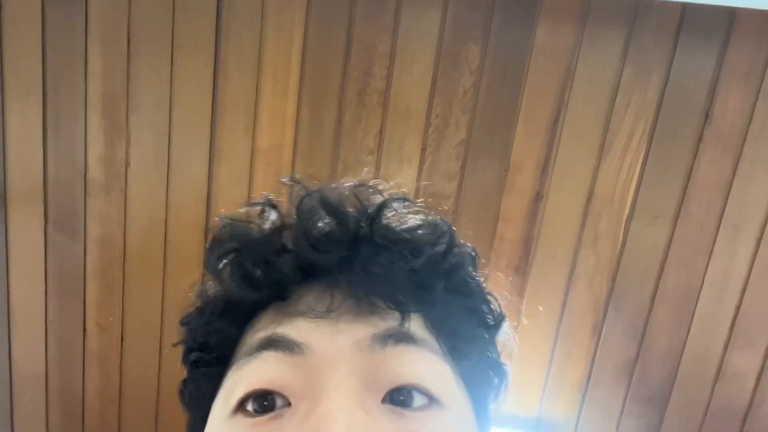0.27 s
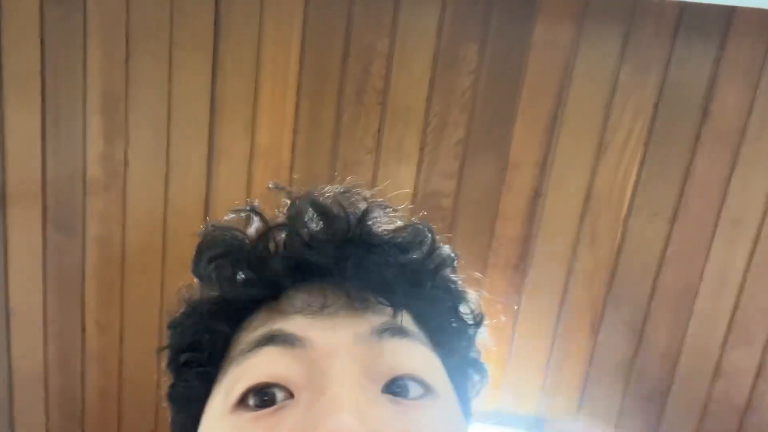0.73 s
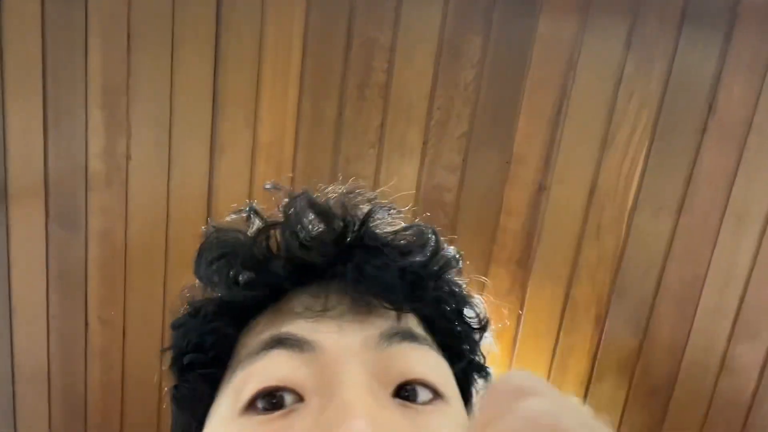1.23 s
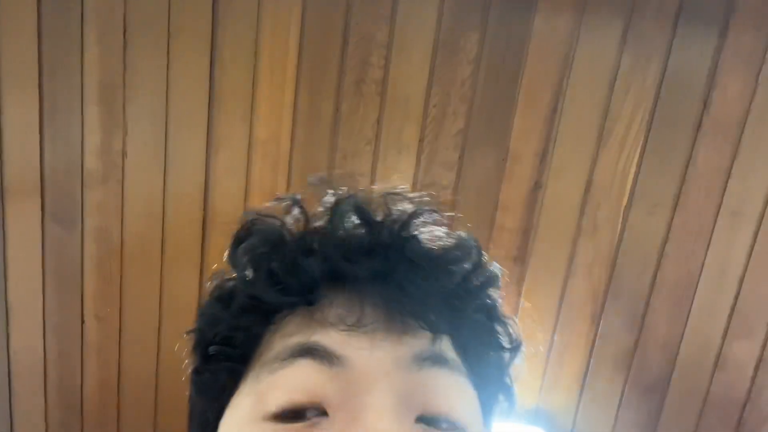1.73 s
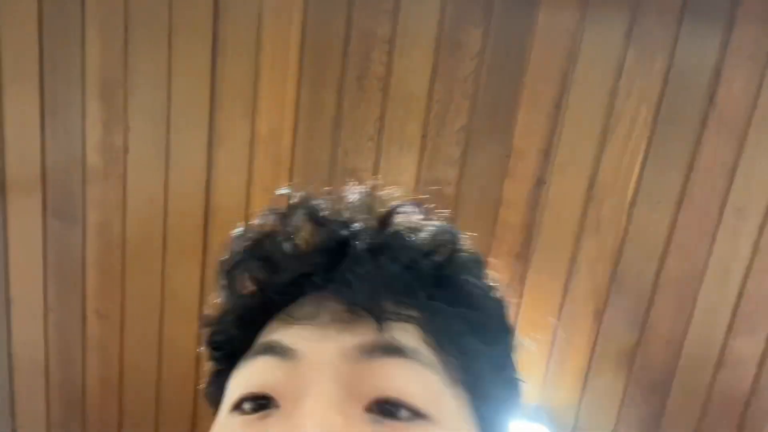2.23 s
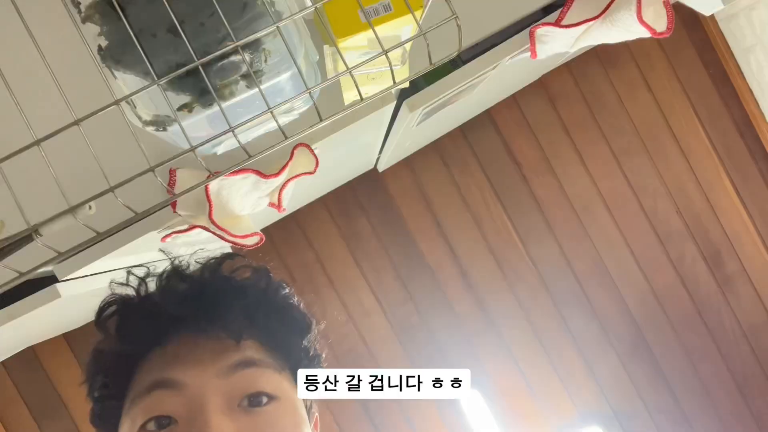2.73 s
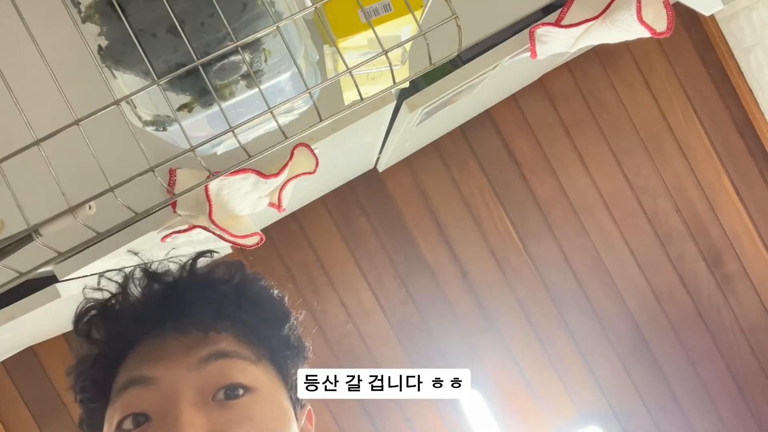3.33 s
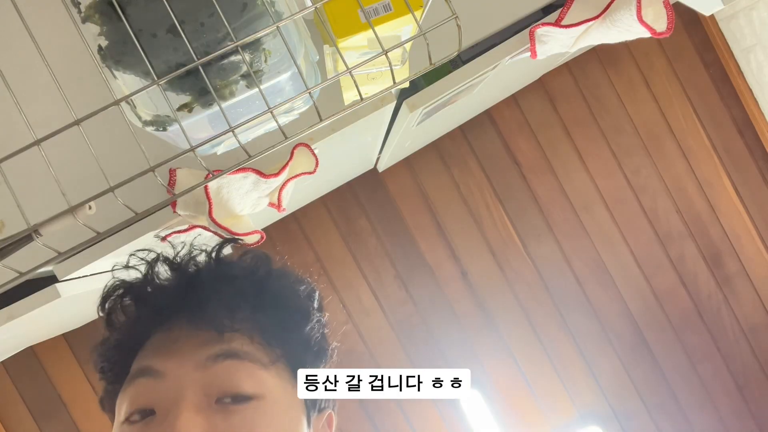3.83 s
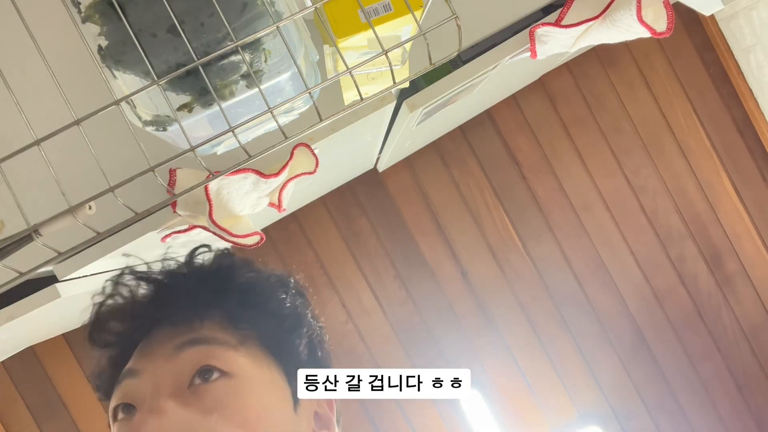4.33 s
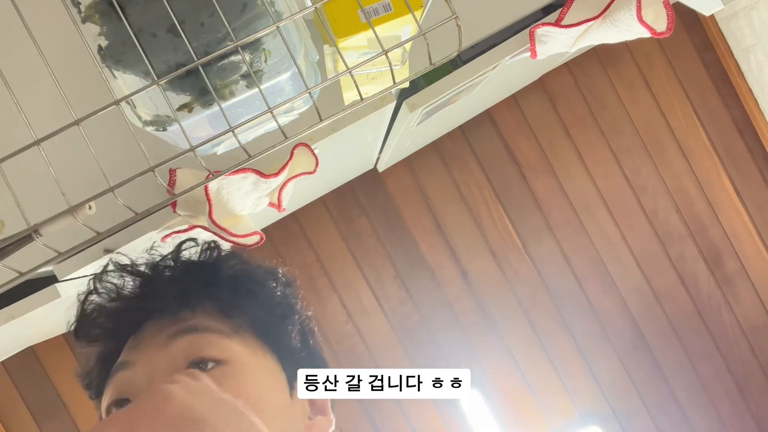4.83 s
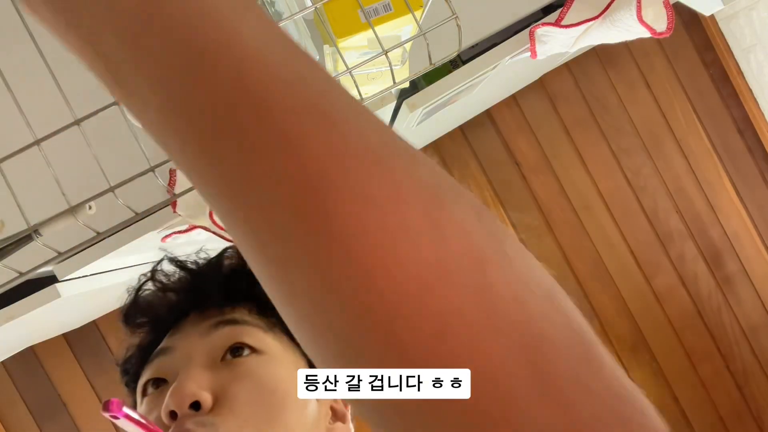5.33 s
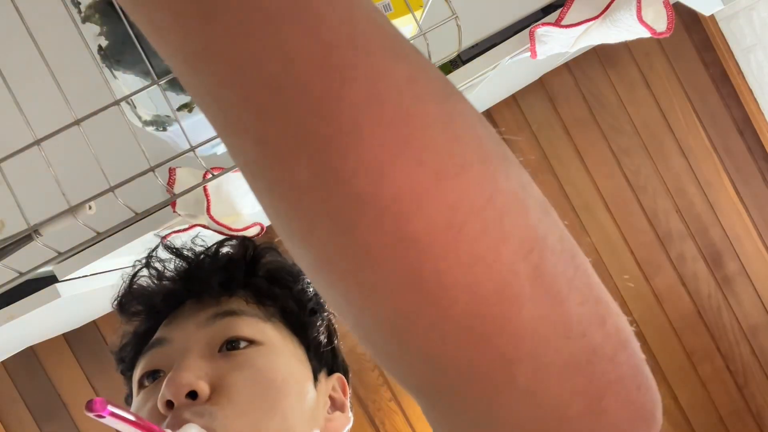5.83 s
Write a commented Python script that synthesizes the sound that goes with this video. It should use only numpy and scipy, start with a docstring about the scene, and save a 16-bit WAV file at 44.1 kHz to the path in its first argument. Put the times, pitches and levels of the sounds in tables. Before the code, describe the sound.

Someone brushes their teeth close to a phone's stereo microphones in a small kitchen where appliances hum. The plastic head ticks against the teeth between light scrubs, then come five hard, foamy strokes, each with a hollow falling note from the mouth. A drop plinks among a few softer scrubs, and the tap suddenly opens, water rushing into a steel sink.

```python
"""Teeth being brushed over a kitchen sink, close to a phone's stereo microphones. The plastic head ticks
on the teeth between light scrubs; then come five hard, foamy strokes, each with a falling hollow note
from the mouth. A drop plinks, the tap opens and water rushes into the steel basin.
Appliances hum in the small room; the room tone changes once, when the phone changes position."""
import sys
import numpy as np
from scipy import signal
from scipy.fft import rfft, irfft, next_fast_len
from scipy.io import wavfile
from scipy.ndimage import map_coordinates

SR = 44100
rng = np.random.default_rng(int(sys.argv[2]) if len(sys.argv) > 2 else 0)


def unload_audio(sound):
    """Save the sound as a 16-bit wav file, at the path given as the first command line argument."""
    columns = np.transpose(np.atleast_2d(sound))
    # keep every value between -1 and 1, then stretch to whole-number steps
    steps = np.round(np.clip(columns, -1, 1) * 32767)
    wavfile.write(sys.argv[1], SR, steps.astype(np.int16))


N = 268128
T = np.arange(N) / SR

# room tone at the phone's first and second position: f/Hz, relative level/dB
AIR_FIRST = [(25, -21), (65, 10.5), (120, -6), (350, -4.5), (600, -10), (1400, -13), (2300, -15),
             (3300, -21), (4200, -24.5), (5000, -28.5), (7500, -17), (14000, -38), (15500, -34)]
AIR_SECOND = [(25, -9.5), (85, 10), (170, -5), (300, -6), (500, -17), (950, -12), (1500, -25), (2500, -19),
              (4500, -28), (7000, -21), (10000, -23.5), (15500, -31.5)]
# appliance hum at each position: f/Hz, level/dB
HUM_FIRST = [(59.2, -65.5), (118.4, -61.5), (156.1, -72), (290.7, -68)]
HUM_SECOND = [(80.7, -62.5), (150.7, -63.5), (274.5, -66), (360.7, -70.5)]
# bass of the room tone at the second position: t/s, gain/dB
BASS_SECOND = [(2.7, -12.5), (3.15, -10.5), (3.4, 1)]
# the kitchen's decay: f/Hz, t60/s
ROOM_DECAY = [(150, 0.32), (2000, 0.41), (12000, 0.097)]
# standing waves in the first room tone, at the second position and in the steel sink:
# f/Hz, width/Hz, level over the direct sound/dB
AIR_MODES = [(1954, 42, 4), (2288, 24, 7), (3330, 66, 7.5), (4660, 330, -6)]
NOOK_MODES = [(187.2, 7.4, 6.5), (271, 11, -3), (335, 13.5, 1), (459.4, 12.4, 4.5), (651, 9.6, -1.5),
              (763, 29, -10.5)]
STEEL_MODES = [(941.5, 11, 6.5), (1045, 11, 6), (1380, 19, -1), (1930, 20, 3), (2087, 24, 6.5),
               (2187, 32, 1), (2570, 19, -4), (2660, 16, 0), (3038, 22, -3)]
# width of the microphone pair at each position and for the water: f/Hz, side minus mid/dB
WIDTH_FIRST = [(60, -39), (270, -9), (700, 2.5), (1400, 4), (2100, 0.5), (3300, 2), (5800, 1), (7500, 9),
               (9300, 27.5), (11500, -6), (13000, -20)]
WIDTH_SECOND = [(60, -8), (160, -7.5), (450, 0.5), (900, 5.5), (2200, 0.5), (6500, 0), (8500, 0),
                (9700, 25), (13300, 44), (14400, -37)]
WIDTH_WATER = [(100, 6), (350, -4), (880, 13), (1100, 9), (1450, 6), (2300, -5.5), (3000, 2.5), (4500, 0),
               (8500, 4), (9600, 21), (13400, 44), (14600, -20)]
# balance at the second position: f/Hz, left minus right/dB
BALANCE_SECOND = [(80, 1.5), (200, 4), (450, -1), (900, -0.5), (1500, -1), (4200, -4), (9500, 1.5)]
# faint swishes of the bristle tips: t/s, length/s, level/dB
SWISHES = [(0.253, 0.17, -65.5), (0.47, 0.18, -65), (0.692, 0.14, -66), (0.892, 0.51, -66),
           (1.71, 0.16, -70), (2.231, 0.1, -61.5), (2.465, 0.1, -64), (2.589, .09, -61)]
# pitch of the high squeak: t/s, f/Hz
SQUEAK_PITCH = [(.88, 11000), (.96, 15400), (1.07, 14200), (1.17, 12900), (1.22, 13400), (1.29, 11000)]
# spectra of spray, hard and light brushing, and the hollow mouth: f/Hz, relative level/dB
SPRAY = [(60, -24), (300, -6), (600, -5.5), (1300, -9), (1850, -8), (2600, 0.5), (3700, -5), (5000, -5.5),
         (6200, -1.5), (8300, -2), (11000, -10.5), (15500, -17)]
BRISTLES = [(200, -2), (900, 11), (1400, -1), (2200, 2), (3200, 1), (3800, 0.5), (4800, 4.5), (7500, -1),
            (10000, -7.5), (15500, -51)]
SOFT_BRISTLES = [(200, -5), (900, 6), (1500, -6.5), (2200, 6), (3500, 0.5), (4600, -1.5), (6500, 3.5),
                 (8500, 0), (11000, -8), (15500, -22)]
MOUTH = [(30, -23), (90, -2), (190, 4.5), (480, -4.5), (850, 2), (1200, -32), (2500, -31)]
# resonances of the basin, the closed mouth and the brush head: f/Hz, width/Hz, level/dB
BASIN_MODES = [(722, 42, -6.5), (954, 72, -0.5), (1173, 80, -2.5), (1364, 150, -7.5)]
MOUTH_MODES = [(275.7, 56, -49.5), (618, 50, -53.5), (2040, 80, -53.5), (2435, 110, -58.5),
               (3320, 170, -55.5), (4120, 200, -59), (5900, 300, -65)]
HEAD_MODES = [(2450, 500, -8), (3470, 440, 21), (6000, 3600, -21)]
# water slaps the basin: t/s, spray/dB, basin/dB, t60/s, slap pitch/Hz
SPLASHES = [(5.7085, -30, -51, 0.017, 6770), (5.7259, -26, -27, 0.023, 2490),
            (5.731, -31, -30.5, 0.15, 2404), (5.7683, -27, -42, .046, 2265), (5.884, -28, -55, 0.027, 8200),
            (5.896, -31.5, -38, 0.043, 2540), (5.997, -39, -24, .07, 1160)]
# the drop's two notes: f/Hz, level/dB, t60/s
PLINK = [(723, -48, .06), (1036, -48.5, 0.16)]
# pockets between cheek and teeth: t/s, length/s, start/Hz, end/Hz, level/dB
POCKETS = [(2.492, 0.058, 2005, 2110, -50.5), (2.605, 0.061, 1697, 1710, -56),
           (2.606, .04, 3530, 3480, -51), (2.654, 0.167, 1780, 1904, -52), (2.711, 0.087, 740, 757, -47),
           (2.819, 0.071, 3430, 3420, -51.5)]
# light scrubs: t/s, length/s, bristles/dB, hollow/dB, lower resonance/Hz, upper resonance/Hz
SCRUBS = [(0.088, 0.15, -51, -55, 850, 2150), (1.718, 0.072, -56.5, -51.5, 272, 3550),
          (1.816, 0.047, -61.5, -51.5, 198, 2090), (2.478, 0.081, -49, -54.5, 312, 2430),
          (2.601, 0.062, -46, -59, 905, 1700), (2.636, 0.095, -60, -47, 1000, 1830),
          (2.684, 0.093, -64, -46.5, 352, 1880), (2.706, 0.12, -48.5, -47, 720, 3280),
          (2.805, .17, -47.5, -47, 760, 3700), (3.214, 0.063, -58.5, -58.5, 820, 2470),
          (4.717, 0.055, -50, -58.5, 770, 3000), (4.768, .08, -50, -59, 800, 2730),
          (4.845, 0.088, -53.5, -62, 850, 2750), (5.039, .14, -50, -67, 900, 2570),
          (5.124, 0.12, -49, -69, 915, 6540)]
# the head meets the teeth: t/s, tick/dB, jaw knock/dB, head resonance/Hz, knock/Hz, rebound/0-1
TICKS = [(0.3626, -35, -57, 3380, 306, 0), (0.3668, -25, -45, 3400, 270, 0),
         (.6, -23.5, -44.5, 3400, 200, .45), (0.8252, -23, -43, 3460, 215, 1),
         (1.285, -51, -43.5, 2500, 300, 0), (1.314, -48, -50, 6000, 302, 0),
         (1.342, -47.5, -48, 2380, 384, 0), (1.476, -38.5, -43, 5500, 292, 1),
         (1.834, -62, -43, 2500, 160, 0), (1.977, -53, -46, 2500, 420, 0),
         (2.002, -39.5, -46, 2520, 564, 0), (2.123, -43, -64, 2080, 298, 0),
         (2.573, -42, -56, 2430, 260, 0), (2.609, -43, -50, 2820, 262, 0),
         (3.458, -41.5, -36, 3370, 215, 0), (3.499, -42, -35, 3100, 207, 0),
         (3.512, -31.5, -38, 2780, 236, 0), (3.5949, -32, -53, 3400, 500, 0),
         (3.601, -32, -40, 4500, 496, 0), (3.686, -32, -40.5, 4270, 284, 0), (4.99, -41, -48, 2700, 298, 0),
         (4.998, -43.5, -49, 2460, 304, 0)]
# how hard the bristles are pressed on: t/s, rasp over the mean of tick and knock/dB
PRESSURE = [(1.2, -11.5), (3.45, -1.5), (5, -21)]
# hard strokes: t/s, rise/s, bristles/dB, mouth/dB, mouth note's start/Hz,
# then the gap between cheek and teeth: lower ring/dB, lower ring/Hz, upper ring/Hz
STROKES = [(3.294, 0.0085, -46, -40.5, 400, -45.5, 3116, 5500),
           (3.583, .008, -41, -39, 480, -42, 3140, 4600),
           (3.858, 0.013, -40.5, -35.5, 643.5, -46, 3320, 4220),
           (4.128, 0.016, -41, -34, 639.5, -50, 3330, 4080),
           (4.4, 0.012, -40.5, -32.5, 674.3, -50, 3320, 4270)]


def amp(db):
    """Decibels to gain."""
    return 10 ** (np.asarray(db) / 20)


def unit(x):
    """x at rms 1."""
    return x / np.sqrt(np.mean(x ** 2) + 1e-20)


def along(points, hz):
    """(f/Hz, value) points read on a log axis."""
    f, v = np.transpose(points)
    return np.interp(np.log(hz + 1), np.log(f + 1), v)


def curve(points, t=T):
    """(t/s, value) points read at the times t."""
    return np.interp(t, *np.transpose(points))


def wobble(rate):
    """A smooth random curve, rate knots a second."""
    return map_coordinates(rng.standard_normal(int(N * rate / SR) + 4), [T * rate])


def filtered(x, response):
    """x times a complex response of frequency."""
    n = x.shape[-1]
    m = next_fast_len(n + 8192)
    return irfft(rfft(x, m) * response(np.fft.rfftfreq(m, 1 / SR)), m)[..., :n]


def coloured(x, spectrum):
    """x with the given spectrum, at rms 1."""
    return unit(filtered(x, lambda hz: amp(along(spectrum, hz))))


def resonance(f, hz, width, db):
    """Complex response of one resonance at the frequencies f."""
    return amp(db) * 1j * f * width / (hz * hz - f * f + 1j * f * width)


def resonate(x, modes):
    """x through a few resonances of alternating sign."""
    return filtered(x, lambda f: sum((-1) ** k * resonance(f, *mode) for k, mode in enumerate(modes)))


def ringing(x, modes):
    """x plus the ring of a few narrow resonances."""
    return filtered(x, lambda f: 1 + sum(resonance(f, *mode) for mode in modes))


def noise(n=N):
    """Two unrelated white noises: mid and side."""
    return rng.standard_normal((2, n))


def tone(hz, t):
    """A sine in mid and side, a quarter cycle apart."""
    return np.sin(2 * np.pi * hz * t + [[0], [np.pi / 2]])


def grainy(grain_db, rate):
    """Noise made of tiny bursts of uneven size."""
    return unit(noise() * amp(grain_db * wobble(rate)))


def band(centre_hz, width_hz):
    """Noise in one narrow resonance whose centre is given for each sample."""
    a, b = (filtered(noise(len(centre_hz)), lambda f: 1 / (1 + (f / width_hz) ** 2)) for _ in range(2))
    phase = 2 * np.pi * np.cumsum(centre_hz) / SR
    return unit(a * np.cos(phase) + b * np.sin(phase))


def clicks(count, size_db, life_s):
    """Tiny cracks of uneven size at random moments, each a puff of noise."""
    when, size = rng.random((count, 2)).T
    energy = np.bincount((when * N).astype(int), amp(size_db * size ** 2) ** 2, N)
    return noise() * np.sqrt(signal.lfilter([1], [1, -np.exp(-2 / (life_s * SR))], energy))


def bubbles(count, centre_hz, octaves, cycles, size_db):
    """Tiny bubbles burst at random moments, each a few cycles of its own pitch."""
    when, pitch, size, side = rng.random((count, 4)).T[..., None]
    k = np.arange(240)
    turns = centre_hz * 2 ** (octaves * (2 * pitch - 1)) * k / SR
    pops = amp(size_db * size ** 2) * np.sin(2 * np.pi * turns) * np.exp(-turns / cycles)
    at = ((when * N).astype(int) + k).ravel()
    mid_side = [pops * share(2 * np.pi * side) for share in (np.cos, np.sin)]
    return unit(np.array([np.bincount(at, part.ravel(), N)[:N] for part in mid_side]))


def add(track, s, sound):
    """Lay a sound into the track at s seconds."""
    part = track[..., round(s * SR):][..., :sound.shape[-1]]
    part += sound[..., :part.shape[-1]]


def burst(t, rise, hold, t60):
    """A smooth rise, a short plateau and an exponential fall, all in seconds."""
    out, live = np.zeros(len(t)), (t > 0) & (t < rise + hold + 2 * t60)
    attack = np.sin(np.pi / 2 * np.minimum(t[live] / rise, 1)) ** 2
    out[live] = attack * amp(-60 * np.maximum(t[live] - rise - hold, 0) / t60)
    return out


def swell(t, length):
    """One pass of the brush: it eases in, then fades more slowly."""
    return np.sin(np.pi * np.clip(t / length, 0, 1) ** 0.64).clip(0) ** 1.1


def microphones(x, width):
    """The phone's pair: share each frequency between mid and side, then form left and right."""
    angle = lambda hz: np.arctan(amp(along(width, hz)))
    mid, side = filtered(x, lambda hz: np.array([np.cos(angle(hz)), np.sin(angle(hz))]))
    return np.array([mid + side, mid - side])


def kitchen(x, wet_db):
    """x with the short answer of the wood-lined room."""
    hz, t, spectra = signal.stft(noise(SR // 3), SR, nperseg=256)
    decay = amp(-60 * t / along(ROOM_DECAY, hz)[:, None])
    tail = signal.istft(spectra * decay, SR, nperseg=256)[1]
    return x + amp(wet_db) * signal.fftconvolve(x, tail / np.linalg.norm(tail[0]), axes=1)[:, :N]


def room_tone(air, air_db, hum):
    """Steady room air, with slightly unsteady motor lines in the mid channel."""
    lines = sum(amp(db) * np.sqrt(2) * np.sin(2 * np.pi * hz * T + 0.63 * wobble(3.91)) for hz, db in hum)
    return amp(air_db) * coloured(noise(), air) + lines * np.array([[1], [0]])


def fizz():
    """A fine high fizz flickers faintly and swells with each swish of the bristle tips."""
    flicker = amp(-74.5 + 6 * wobble(13.94))
    swishes = sum(amp(db) * swell(T - s, length) for s, length, db in SWISHES)
    hiss = coloured(noise(), [(3000, -16), (6000, -4.5), (9000, -9), (14000, -9.5), (15800, -13)])
    return (flicker + swishes) * hiss


def squeak():
    """A thin, very high squeak arches and sinks, and keeps breaking off."""
    start, end = SQUEAK_PITCH[0][0], SQUEAK_PITCH[-1][0]
    level = amp(-72 + 7 * wobble(45)) * swell(T - start, end - start)
    return level * band(curve(SQUEAK_PITCH), width_hz=120)


def drip(at_s=4.873):
    """One drop plinks in the sink on two short notes."""
    return sum(amp(db) * tone(hz, T) * burst(T - at_s, rise=0.0072, hold=0.002, t60=t60)
               for hz, db, t60 in PLINK)


def water(leak_s=5.668, jet_s=5.724, jet_rise_s=0.0029, build_s=0.18):
    """The tap sputters and the jet hits the basin: spray and spatter on top, the hollow bowl below."""
    leak = amp(-45.5 - 328 * np.maximum(leak_s - T, 0))  # thin first spray as the valve opens
    build_db = -2.5 * np.clip(1 - (T - jet_s) / build_s, 0, 1)
    jet = amp(-33 + build_db) * np.clip((T - jet_s) / jet_rise_s, 0, 1)
    spray = np.hypot(leak, jet)
    basin = np.hypot(amp(-10) * leak, amp(-1.5 + 1.6 * wobble(25)) * jet)
    slaps, t = np.zeros((2, N)), np.arange(SR // 5) / SR
    for s, spray_db, basin_db, t60, slap_hz in SPLASHES:
        hit = lambda t: burst(t, rise=0.00038, hold=0.0018, t60=t60)
        spray = np.hypot(spray, amp(spray_db) * hit(T - s))
        basin = np.hypot(basin, amp(basin_db) * hit(T - s))
        add(slaps, s, amp(spray_db - 5.5) * hit(t) * band(np.full(len(t), slap_hz), 0.12 * slap_hz))
    rush = coloured(grainy(grain_db=1, rate=1500), SPRAY) * amp(-2.5 + 1.4 * wobble(90))
    spatter = amp(-4.5) * coloured(clicks(count=1700, size_db=9.5, life_s=0.00073), SPRAY)
    froth = amp(-8.5) * bubbles(count=9000, centre_hz=5430, octaves=0.94, cycles=2.3, size_db=14)
    bowl = unit(resonate(noise(), BASIN_MODES))
    return spray * (rush + spatter + froth) + slaps + basin * bowl


def pockets():
    """Small pockets ring as the brush passes, each on one resonance that slides as the cheek moves."""
    out, t = np.zeros((2, N)), np.arange(SR // 3) / SR
    for s, length, start_hz, end_hz, db in POCKETS:
        centre = np.interp(t, [0, length], [start_hz, end_hz])
        add(out, s, amp(db - 2) * swell(t, length) * band(centre, 20 + 0.019 * start_hz))
    return out


def rub(at_s=0.087, length_s=0.174):
    """One hollow rub inside the closed mouth; its resonances rise as the cavity tightens."""
    out, t = np.zeros((2, N)), np.arange(SR // 3) / SR
    tighten = 1 + 0.0385 * t / length_s
    cavity = sum(amp(db) * band(hz * tighten, width) for hz, width, db in MOUTH_MODES)
    add(out, at_s, swell(t, length_s) * cavity)
    return out


def scrubs():
    """Light passes, and a soft pull back ahead of each hard stroke, sound two resonances of the mouth."""
    out, rasp = np.zeros((2, N)), np.zeros(N)
    t = np.arange(SR // 3) / SR
    pull_backs = [(s - 0.32, 0.45, -57.5, -56, 155, 2800) for s, *_ in STROKES]  # columns as in SCRUBS
    for s, length, bristle_db, hollow_db, lower_hz, upper_hz in list(SCRUBS) + pull_backs:
        lower = [(lower_hz, 130 + 0.43 * lower_hz, 0)]
        hollow = amp(hollow_db) * unit(resonate(resonate(noise(len(t)), lower), lower))
        upper = amp(bristle_db - 7) * unit(resonate(noise(len(t)), [(upper_hz, 0.15 * upper_hz, 0)]))
        add(out, s, swell(t, length) * (hollow + upper))
        add(rasp, s, amp(bristle_db - 2) * swell(t, length))
    open_lips = np.interp(T, [0.3, 2.4], [0.15, 1])  # closed lips hold back the highest hiss
    hiss = coloured(grainy(grain_db=2, rate=700), SOFT_BRISTLES)
    muffled = filtered(hiss, lambda hz: amp(along([(6200, 3.5), (7800, -50)], hz)))
    return out + rasp * (muffled + open_lips * (hiss - muffled))


def contacts(rebound_s=0.0167):
    """Each contact of head and teeth, then its duller, heavier rebound if it has one."""
    for s, tick_db, knock_db, head_hz, knock_hz, rebound in TICKS:
        yield s, tick_db, knock_db, head_hz, knock_hz
        if rebound > 0.1:
            share_db = 20 * np.log10(rebound)
            yield s + rebound_s, tick_db + share_db - 9, knock_db + share_db + 5.5, head_hz, knock_hz


def ticks():
    """Bristles drag in, the plastic head snaps and rings, the jaw knocks and the bristles spring back."""
    out, t = np.zeros((2, N)), np.arange(SR // 10) / SR
    thud_spectrum = [(100, -8), (500, -1.5), (1100, -7), (2200, -12), (5000, -42)]
    for s, tick_db, knock_db, head_hz, knock_hz in contacts():
        rasp_db = (tick_db + knock_db) / 2 + curve(PRESSURE, s)
        # the point of contact shifts all resonances of the head together
        head = [(hz * head_hz / HEAD_MODES[1][0], width, db) for hz, width, db in HEAD_MODES]
        ring = tone(head_hz, t) * burst(t, rise=0.00061, hold=0.00012, t60=0.0034)
        snap = tone(6900, t) + amp(-4) * tone(2140, t)
        snap *= burst(t - 0.0003, rise=0.000086, hold=0, t60=0.00087)
        quiver = unit(resonate(noise(len(t)), head)) * burst(t, rise=0.0018, hold=0.0017, t60=0.032)
        knock = tone(knock_hz, t) * burst(t, rise=0.0031, hold=0.00062, t60=0.024)
        thud = coloured(noise(len(t)), thud_spectrum) * burst(t, rise=0.00075, hold=0.0012, t60=0.047)
        rasp = coloured(noise(len(t)), BRISTLES) * burst(t, rise=0.00021, hold=0.0012, t60=0.078)
        drag = unit(resonate(noise(len(t)), head)) * np.exp(-t[::-1] / 0.019)
        add(out, s - t[-1], amp(tick_db - 26) * drag)
        add(out, s, amp(tick_db) * (amp(3) * ring + amp(-2) * snap + amp(-19) * quiver))
        add(out, s, amp(knock_db) * (knock + amp(-5.5) * thud) + amp(rasp_db) * rasp)
    return out


def strokes():
    """Bristles snap, rasp and crackle while the head pushes into the cheek, lowering the mouth's note."""
    out, (rasp, bite, hollow) = np.zeros((2, N)), np.zeros((3, N))
    t = np.arange(SR // 2) / SR
    for s, rise, bristle_db, mouth_db, start_hz, ring_db, lower_hz, upper_hz in STROKES:
        rasp += amp(bristle_db) * burst(T - s, rise, hold=0.012, t60=0.53)
        bite += amp(bristle_db) * burst(T - s, rise, hold=0.0074, t60=0.17)  # bristles catch, snap free
        hollow += amp(mouth_db - 5) * burst(T - s, 2 * rise, hold=0.0093, t60=0.49)
        pitch = start_hz * (0.3 + 0.7 * np.exp(-(t / 0.045) ** 1.588))
        waver = unit(filtered(noise(len(t)), lambda f: np.exp(-(f / 70) ** 2)))
        phase = 2 * np.pi * np.cumsum(pitch) / SR + [[0], [-1.75]]
        note = (1 + 0.23 * waver) * np.sin(phase + 1.03 * waver[::-1])
        add(out, s, amp(mouth_db + 0.14) * burst(t, rise, hold=0.027, t60=0.15) * note)
        # the narrow gap between cheek and teeth rings on two wandering notes
        cheek = 1 + 0.012 * wobble(29.7)[:len(t)]
        lower = amp(ring_db) * band(lower_hz * cheek, width_hz=130)
        upper = amp(bristle_db - 8.5) * band(upper_hz * cheek, width_hz=260)
        add(out, s, (lower + upper) * burst(t, rise, hold=0.0084, t60=0.43))
    foam = amp(-8) * bubbles(count=9000, centre_hz=4830, octaves=0.78, cycles=1, size_db=11)
    snaps = coloured(clicks(count=1500, size_db=11.5, life_s=0.0005), BRISTLES)
    hiss = amp(-1.5) * coloured(noise(), BRISTLES)
    return out + rasp * (hiss + foam) + bite * snaps + hollow * coloured(noise(), MOUTH)


def scene(move_s=2.64, crossfade_s=0.021):
    """Close brushing from two microphone positions in turn, then the tap."""
    close = kitchen(strokes() + scrubs() + rub() + pockets(), wet_db=-8.5)
    close += kitchen(ticks() + drip(), wet_db=-17)

    first_air = ringing(room_tone(AIR_FIRST, air_db=-54, hum=HUM_FIRST), AIR_MODES)
    first_air = filtered(first_air, lambda hz: amp(along([(5000, 1), (9000, -20)], hz)))
    leftward = np.array([[0.5], [-0.5]])  # 1 dB of left minus right
    first = microphones(close + first_air + fizz() + squeak(), WIDTH_FIRST) * amp(-leftward)

    second_air = room_tone(AIR_SECOND, air_db=-53, hum=HUM_SECOND)
    bass = filtered(second_air, lambda hz: np.exp(-(hz / 180) ** 2))
    second_air += (amp(curve(BASS_SECOND)) - 1) * bass
    second = microphones(ringing(close + second_air, NOOK_MODES), WIDTH_SECOND)
    second = filtered(second, lambda hz: amp(along(BALANCE_SECOND, hz) * leftward))

    sink = kitchen(ringing(water(), STEEL_MODES), wet_db=-9)
    tap = microphones(sink, WIDTH_WATER) * amp(leftward)
    moved = np.clip((T - move_s) / crossfade_s, 0, 1)
    return (1 - moved) * first + moved * second + tap


def record(dry):
    """The phone keeps nothing above 16 kHz."""
    return filtered(dry, lambda hz: hz < 16000)


dry = scene()
out = record(dry)
unload_audio(out)
```